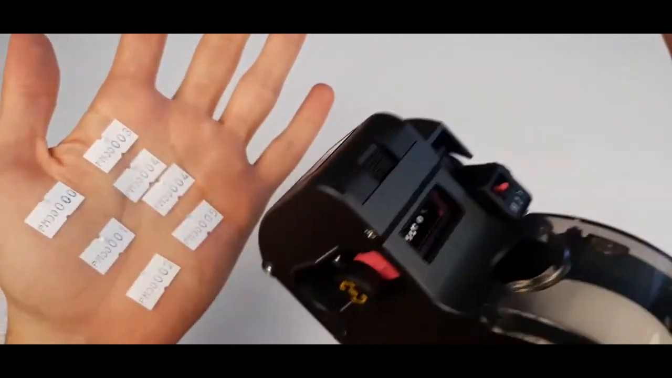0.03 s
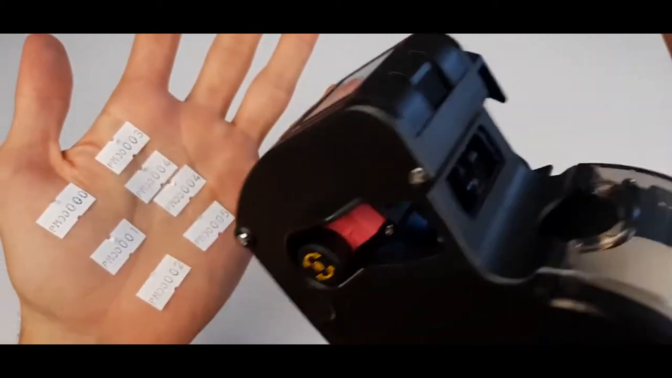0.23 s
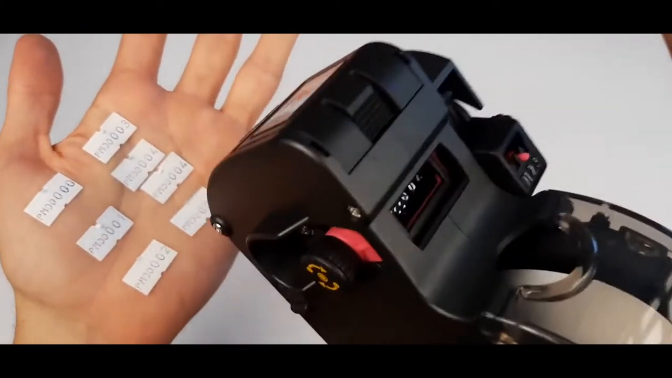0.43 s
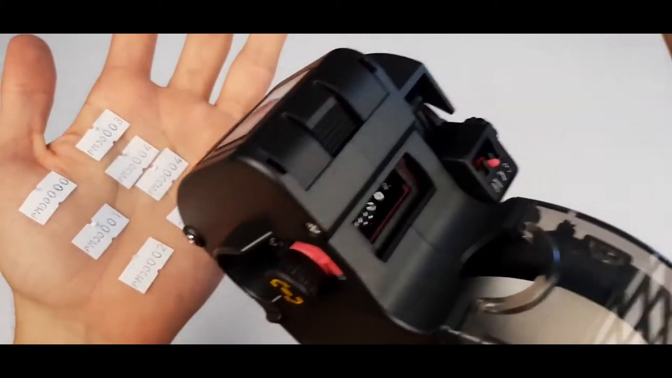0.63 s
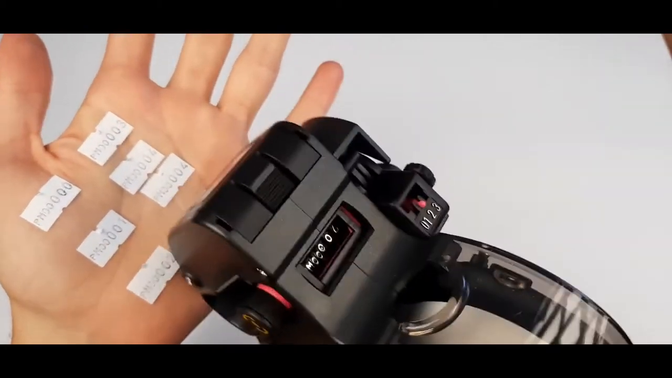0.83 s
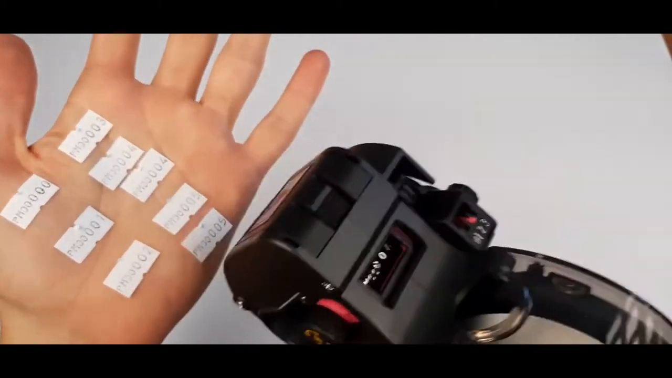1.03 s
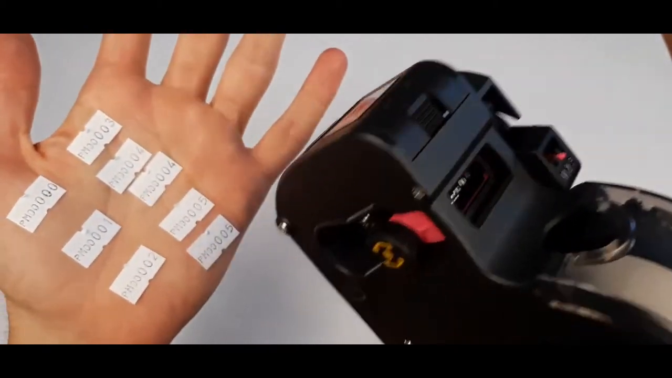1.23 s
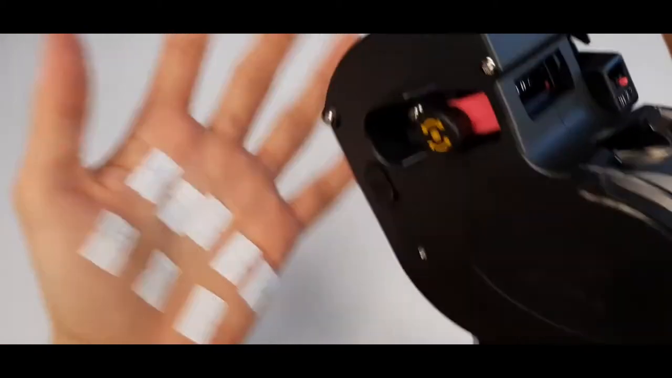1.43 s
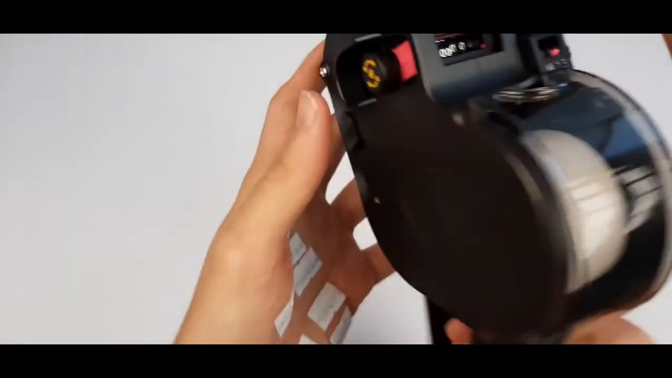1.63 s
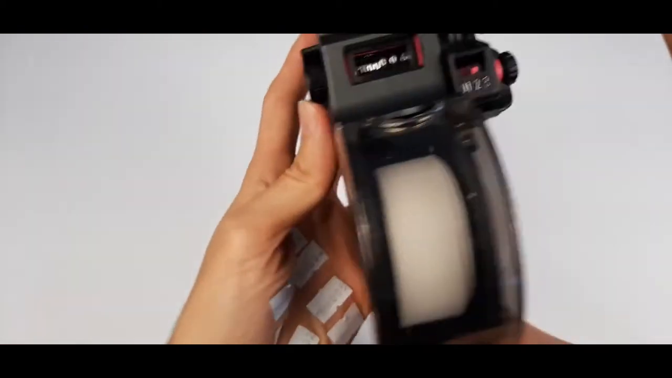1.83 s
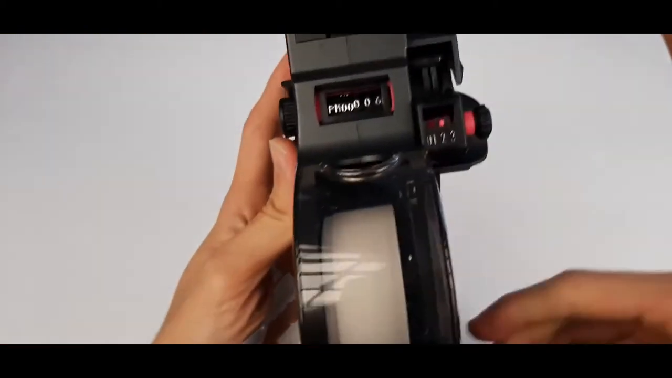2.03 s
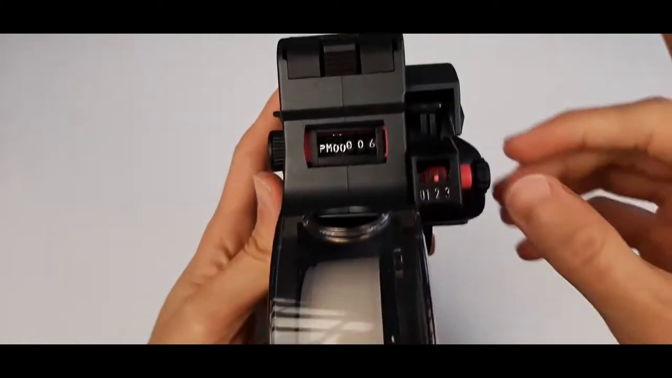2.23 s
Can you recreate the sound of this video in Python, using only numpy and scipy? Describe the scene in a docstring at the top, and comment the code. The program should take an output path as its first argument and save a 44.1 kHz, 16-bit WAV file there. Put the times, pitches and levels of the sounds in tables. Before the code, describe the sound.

Close up in a small quiet room, a hand-held labeling gun gives two sharp plastic clacks as its trigger is pulled and let go. Then it is turned in the hands with light clicks and soft rubbing.

```python
"""A small quiet room, close to a stereo microphone: a plastic labeling gun is squeezed and released once.
Each knock is a short chatter of plastic on plastic ringing through the housing, and the stamp sets a
spring humming faintly. The gun is then touched to a palm and turned over in the hands, with small ticks
and rubs. Knocks and rubs are both clouds of tiny impacts; a short reverb and low room tone sit behind."""
import sys
import numpy as np
from scipy import signal
from scipy.io import wavfile
from scipy.ndimage import uniform_filter1d

SR = 44100
rng = np.random.default_rng(int(sys.argv[2]) if len(sys.argv) > 2 else 0)


def master(y):
    """Save y as 16-bit WAV."""
    cut = np.clip(np.atleast_2d(y).T, -1, 1)
    pcm = np.round(cut * 32767)  # scale
    wavfile.write(sys.argv[1], SR, pcm.astype(np.int16))


N = 101430
PREROLL = 13230  # samples ahead of t = 0

# Knocks of mechanism and housing: t/s, level/dB, f/Hz, treble/dB, band edge ratio, chatter length/s
KNOCKS = [(0.2303, -34.5, 1560, -6.5, 2.5, 0.012), (0.245, -14, 2360, -2.5, 1.87, 0.0023),
          (0.25, -16.5, 1630, -5, 2.15, 0.011), (0.2525, -11, 1190, 0, 2.08, 0.0019),
          (0.258, -16.5, 776, -1.5, 1.6, 0.002), (0.2612, -23, 1000, -11, 1.7, 0.001),
          (0.27, -26.5, 2013, -11, 1.4, 0.0022), (0.303, -31, 1102, -10, 1.6, 0.0024),
          (.3738, -33, 1051, 3.5, 1.5, 0.003), (0.3952, -24, 1600, -7, 2, 0.014),
          (.403, -12, 2501, 0.5, 1.6, 0.0032), (0.4059, -19.5, 1250, -9, 1.1, 0.0013),
          (0.4107, -28, 1801, -3, 1.5, 0.002), (.633, -61, 5650, 1.5, 1.26, 0.0018),
          (0.826, -57, 778, -17, 1.39, 0.0056), (0.8287, -43, 4296, 5.5, 2.27, 0.0044),
          (0.888, -47, 2510, -3, 1.33, 0.005), (0.9336, -53.5, 1703, 3, 1.8, 0.0036),
          (1.018, -62.5, 5516, 0.5, 1.1, 0.0031), (1.038, -55, 3000, -5.5, 2.2, 0.0018),
          (1.421, -72.5, 930, -18.5, 1.27, 0.0038), (1.465, -75, 3232, -11.5, 1.46, 0.0028),
          (1.492, -70.5, 1313, -29.5, 1.8, 0.0035), (1.58, -58, 1080, 5.5, 1.52, 0.007),
          (1.6233, -34.5, 3800, -3, 1.99, 0.004), (1.723, -57.5, 1500, -14.5, 1.58, 0.003),
          (1.837, -57, 4380, -6, 1.96, 0.0049), (1.855, -53.5, 1780, -2, 2.2, 0.0041),
          (1.963, -56.5, 3493, -5, 1.97, 0.0038), (1.9922, -53.5, 1400, -27.5, 3.3, 0.0021)]
# A release just before the start, heard only as a reverb tail: same columns
EARLY_RELEASE = (-0.2974, -16, 4199, -1.5, 2.74, 0.06)
# Sliding parts and skin on plastic: t/s, level/dB, f/Hz, treble/dB, band edge ratio, rise/s, 30 dB fall/s
RUBS = [(0.21, -67, 1150, -11, 1.65, 0.0035, 0.12), (0.246, -29, 1600, -10, 2.21, 0.0034, 0.14),
        (0.281, -45, 1117, -5.5, 2.46, 0.046, 0.18), (0.361, -29.5, 2286, -7, 2.2, 0.015, 0.095),
        (0.823, -56.5, 1994, -6, 4.05, 0.0057, 0.26), (0.891, -65.5, 2350, -2.5, 1.11, 0.0024, 0.25),
        (1.0, -62.5, 2220, -5, 2, 0.012, 0.095), (1.451, -67, 1276, -24.5, 1.52, 0.041, 0.071),
        (1.627, -56, 2986, -1, 2.2, 0.0077, 0.076), (1.603, -75.5, 1990, 1, 1.34, 0.16, 0.85),
        (1.795, -66.5, 1388, -8, 1.48, 0.0089, 0.39), (1.953, -52.5, 1487, -22, 1.69, 0.038, 0.065)]
# Broad colour of the housing: f/Hz, level/dB
HOUSING_EQ = [(40, -47), (100, -21), (300, -8.5), (500, -21), (700, 0), (2000, -5), (7000, 1), (9000, -9),
              (13000, -7.5), (16500, -21)]
# Modes of the plastic shell: f/Hz, level/dB, t60/s
SHELL_MODES = [(270, -4, .12), (750, 8, .04), (1025, 6, .04), (1290, 4, .04), (1650, 0, .04),
               (1910, 1, .04), (2155, 1, .04), (2420, 1, .025), (2700, 0, .035), (3050, 2, .03),
               (3300, 1, .03), (4280, -3, .03), (5450, 4, .025), (7150, 0, .025)]
# Modes of the spring: f/Hz, level/dB, t60/s
SPRING_MODES = [(584, -88, 3), (594, -84, 3), (605, -86, 3)]
# Reverb time of the room: f/Hz, t60/s
ROOM_DECAY = [(150, 0.98), (400, 0.42), (1040, 0.47), (2760, 0.4), (9000, 0.28)]
# Room tone spectrum: f/Hz, relative level/dB
AIR_EQ = [(25, -10), (55, -0.5), (140, -3), (300, -8), (600, -16), (1000, -17.5), (2200, -27), (4500, -34),
          (9000, -36.5), (13000, -39), (16500, -37)]
# Room tone likeness between the channels: f/Hz, correlation
AIR_LIKENESS = [(60, 0.93), (950, 0.68), (15000, 0.046)]
# Room tone balance: f/Hz, left over right/dB
AIR_PAN = [(60, 12), (15000, 4.5)]
# Swell of the low rumble: t/s, relative level/dB
RUMBLE_SWELL = [(0.0, -79.5), (0.261, -76.5), (2.3, -65.5)]
# Faint steady whine: f/Hz, half-width/Hz, level/dB
WHINES = [(7100, 200, -92)]


def knocks():
    """Plastic hits plastic: a fast attack, a few milliseconds of chatter, a steep decay."""
    mix, grains = np.zeros((2, N + PREROLL)), contacts(per_s=6000)
    t = np.arange(0, .025, 1 / SR)
    attack = np.minimum(t / 0.0016, 1)
    for *hit, length in KNOCKS + [EARLY_RELEASE]:
        decay = np.exp(-(t / (length + 0.001)) ** 2.4)
        add_burst(mix, grains, attack * decay, *hit)
    return mix


def rubs():
    """Sliding parts and skin on plastic: grainy friction that swells and fades."""
    mix, grains = np.zeros((2, N + PREROLL)), contacts(per_s=7000)
    for *stroke, rise, fall in RUBS:
        t = np.arange(0, rise + 2 * fall, 1 / SR)
        envelope = np.minimum(t / rise, 1) ** 2 * amp(-30 * np.maximum(t - rise, 0) / fall)
        add_burst(mix, grains, envelope, *stroke)
    return mix


def contacts(per_s):
    """Tiny impacts of uneven size; the right channel shares the lows but has its own treble."""
    n = N + PREROLL
    sizes = rng.standard_normal((2, n)) * amp(1.5 * np.minimum(rng.exponential(1, n), 4))
    left, other = sizes * (rng.random(n) < per_s / SR)
    right = left + band(other - left, "high", 2430)
    return np.array([left, np.roll(right, 2)])  # right lags by two samples


def add_burst(mix, grains, envelope, start, db, hz, treble_db, ratio):
    """Shapes the impacts with an envelope and mixes them in as a pitched band, a thud and a bright top."""
    at = PREROLL + round(start * SR)
    span = slice(at, at + len(envelope))
    burst = grains[:, span] * envelope[:grains.shape[1] - at]
    edges = np.clip([hz / ratio, hz * ratio], 50, SR / 2.2)
    thud_db = 4.5 + 1.79 * db  # harder blows carry more low thud
    layers = [(0, band(burst, "band", edges, order=3)),
              (thud_db, band(burst, "low", 380)),
              (treble_db, band(burst, "high", 4060))]
    tone = sum(amp(level) * layer / np.linalg.norm(layer) for level, layer in layers)
    mix[:, span] += amp(db) * tone * np.linalg.norm(envelope) * np.sqrt(2)


def housing(x, ring_db=-11):
    """The plastic shell colours every contact and rings briefly at its modes."""
    log_gain = np.log(amp(curve(HOUSING_EQ, abs(np.fft.fftfreq(4096, 1 / SR)))))
    colour = np.fft.ifft(np.exp(np.conj(signal.hilbert(log_gain)))).real[:2048]  # minimum phase
    shell = ringing(SHELL_MODES, seconds=0.17)
    body = amp(ring_db) * shell / np.linalg.norm(shell[0])
    body[:, :2048] += colour / np.linalg.norm(colour)
    return resonate(x, body)


def spring(x):
    """Only the stamp shakes the spring, which hums on long and faint."""
    t = (np.arange(x.shape[1]) - PREROLL) / SR
    stamp = x * ((t > .24) & (t < .27))
    return resonate(stamp, ringing(SPRING_MODES, seconds=2.2))


def ringing(modes, seconds):
    """Struck modes: decaying sines, slightly out of phase between the channels."""
    t = np.arange(0, seconds, 1 / SR)
    ring = np.zeros((2, len(t)))
    for hz, db, t60 in modes:
        phase = hz / 9000 * rng.uniform(0.31, 1, (2, 1))
        ring += amp(db - 60 * t / t60) * np.sin(2 * np.pi * hz * t + phase)
    return ring


def reverb(x, wet_db=-13):
    """Wall reflections: sparse taps of random sign, each band dying at its own speed."""
    taps = np.zeros((2, SR))
    at = np.arange(200, SR - 20, 20) + rng.integers(0, 20, (2, (SR - 201) // 20))
    np.put_along_axis(taps, at, rng.choice([-1., 1.], at.shape), 1)
    # Shared lows, wide highs.
    taps[1] = band(taps[0], "low", 2600, order=4) + band(taps[1], "high", 1200, order=4)
    hz, t, spectrum = signal.stft(taps, SR, nperseg=256)
    decay = amp(-60 * t / curve(ROOM_DECAY, hz)[:, None])
    tail = signal.istft(spectrum * decay, SR, nperseg=256)[1]
    return amp(wet_db) * resonate(x, tail / np.linalg.norm(tail, axis=1, keepdims=True))


def room_tone(bed_db=-69.5):
    """A bed of gently mottled noise whose bass swells slowly, with a faint high whine."""
    frames, hz = N // 256 + 5, np.fft.rfftfreq(1024, 1 / SR)
    left_re, left_im, other_re, other_im, mottle = rng.standard_normal((frames, 513, 5)).T
    left, other = left_re + 1j * left_im, other_re + 1j * other_im
    likeness = curve(AIR_LIKENESS, hz)[:, None]
    noise = np.array([left, likeness * left + np.sqrt(1 - likeness ** 2) * other])
    noise *= amp(np.multiply.outer([.5, -.5], curve(AIR_PAN, hz))[..., None])
    mottle_db = 0.5 * unit_rms(uniform_filter1d(uniform_filter1d(mottle, 4, 0), 8, 1))
    times, levels = np.transpose(RUMBLE_SWELL)
    swell = np.interp(np.arange(frames) * 256 / SR, times, levels - np.interp(1.3, times, levels))
    rumble_db = swell / (1 + (hz[:, None] / 400) ** 2)
    bed = unit_wave(noise * amp(curve(AIR_EQ, hz)[:, None] + mottle_db + rumble_db))
    whine = sum(amp(db) * unit_wave(noise / (1 + ((hz[:, None] - f) / width) ** 2))
                for f, width, db in WHINES)
    return amp(bed_db) * bed + whine


def amp(db):
    return 10 ** (np.asarray(db) / 20)


def unit_rms(x):
    return x / np.sqrt(np.mean(x ** 2) + 1e-20)


def unit_wave(spectrum):
    return unit_rms(signal.istft(spectrum, nperseg=1024, noverlap=768)[1][:, :N])


def curve(points, hz):
    f, value = np.transpose(points)
    return np.interp(np.log(hz + 1), np.log(f + 1), value)


def band(x, kind, hz, order=2):
    return signal.sosfilt(signal.butter(order, hz, kind, fs=SR, output="sos"), x)


def resonate(x, response):
    return signal.fftconvolve(x, response, axes=1)[:, :x.shape[1]]


def scene():
    """The gun up close and a little to the left, over its reverb and the room tone."""
    handling = knocks() + rubs()
    gun = (housing(handling) + spring(handling)) * amp([[2.5], [-2.5]])
    return (gun + reverb(gun))[:, PREROLL:] + room_tone()


def record(dry):
    """Bass roll-off, soft overload on the loudest peaks, then a steep top cut."""
    saturated = 1.266 * np.tanh(band(dry, "high", 51, order=3) / 1.113)
    top_cut = signal.firwin(511, 16800, window=("kaiser", 9), fs=SR)
    return signal.oaconvolve(saturated, top_cut[None], "same")


dry = scene()
out = record(dry)
master(out)
```